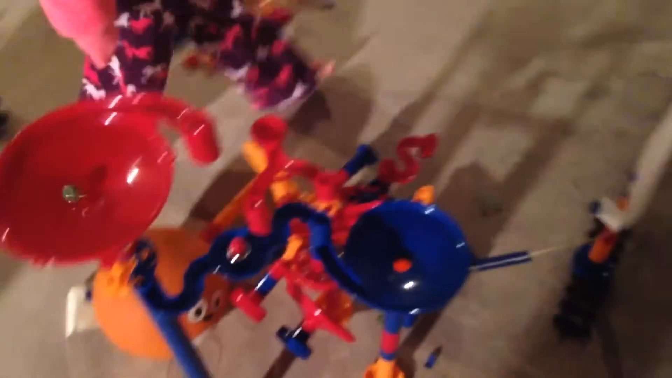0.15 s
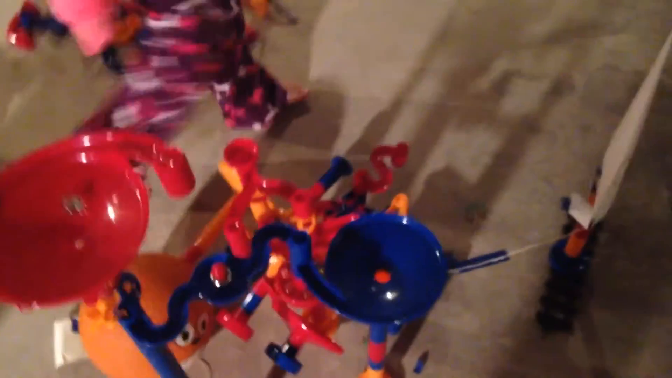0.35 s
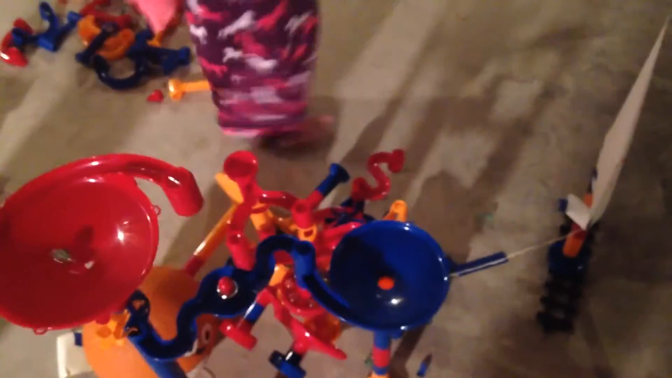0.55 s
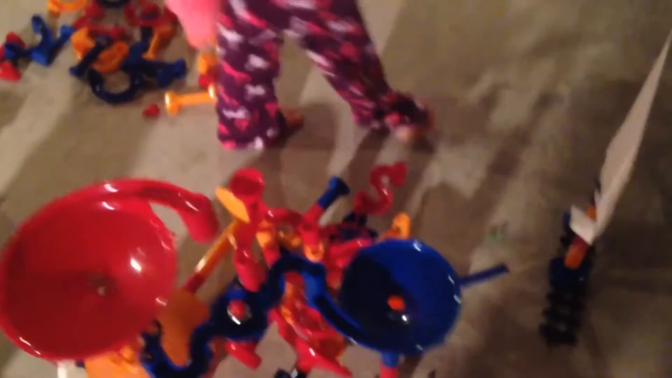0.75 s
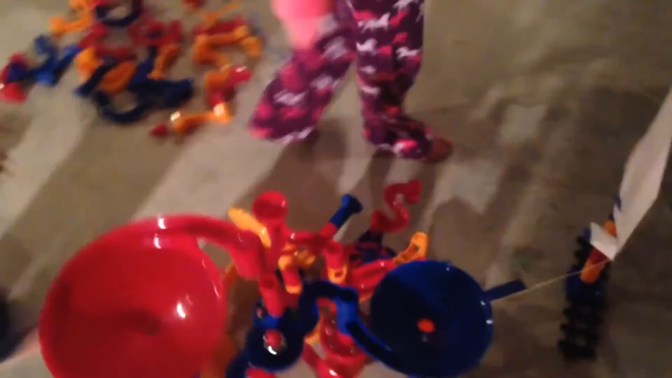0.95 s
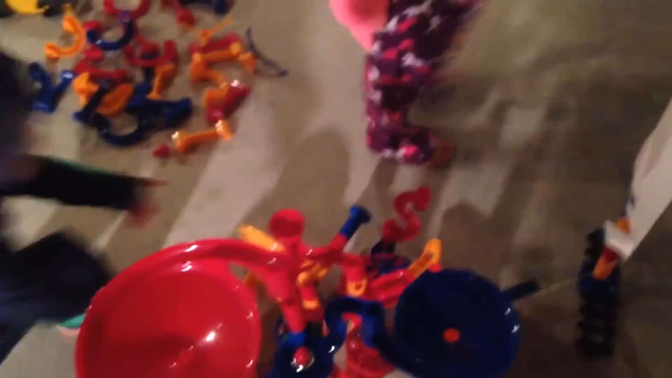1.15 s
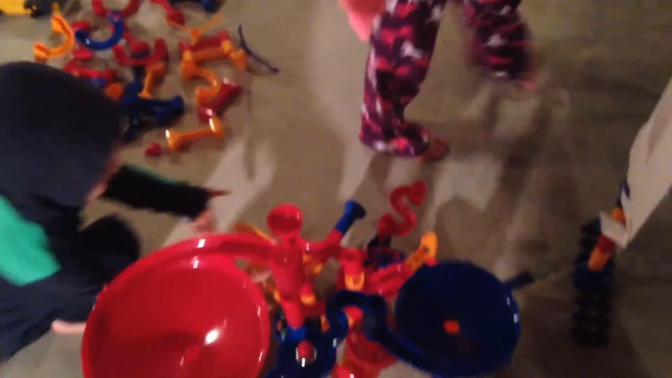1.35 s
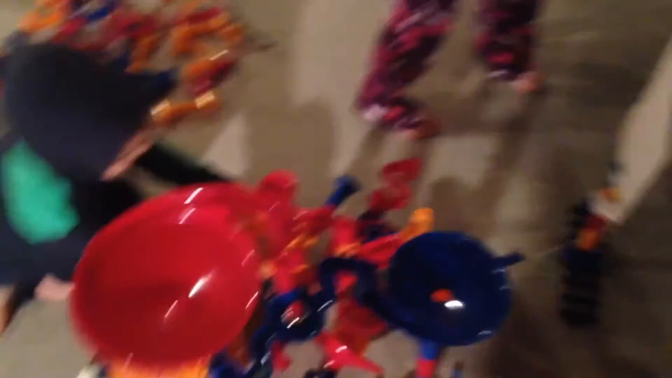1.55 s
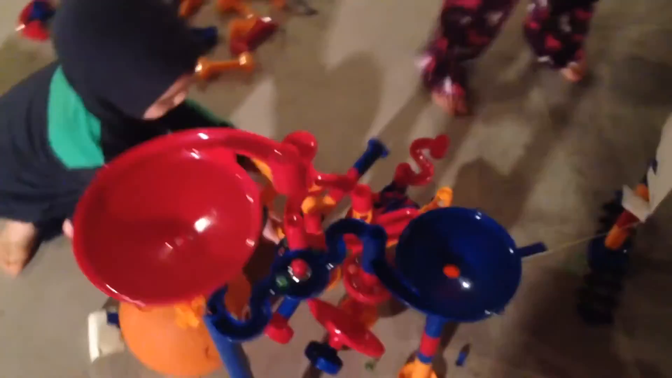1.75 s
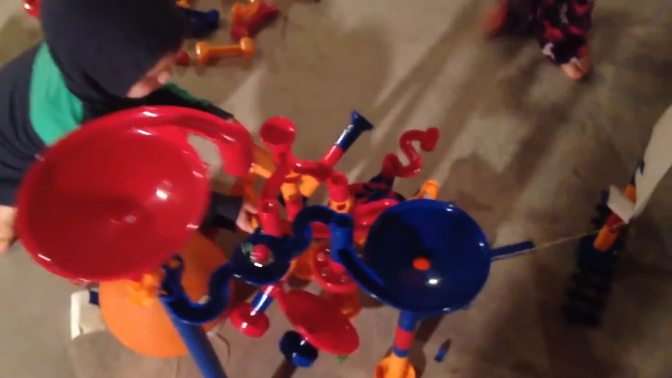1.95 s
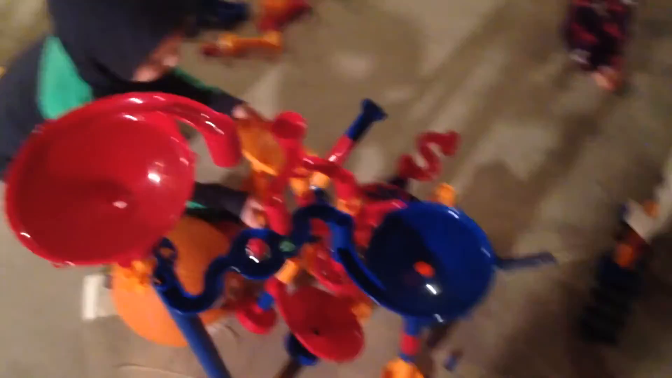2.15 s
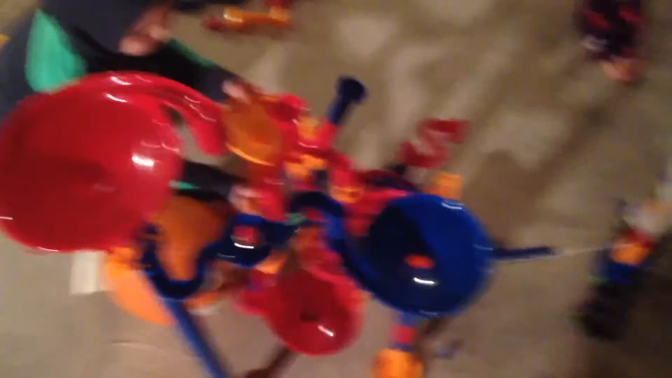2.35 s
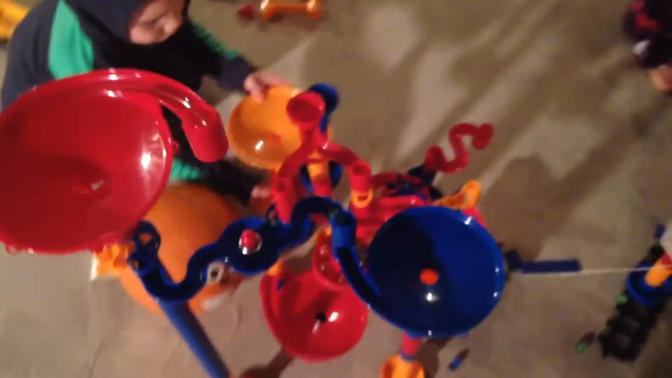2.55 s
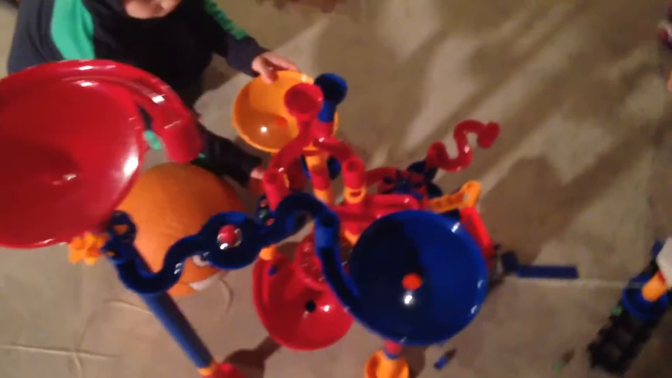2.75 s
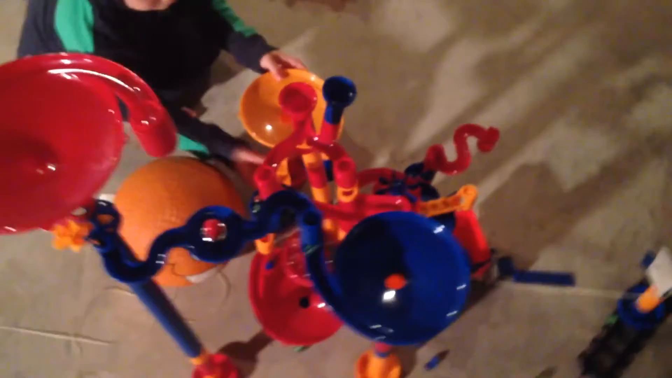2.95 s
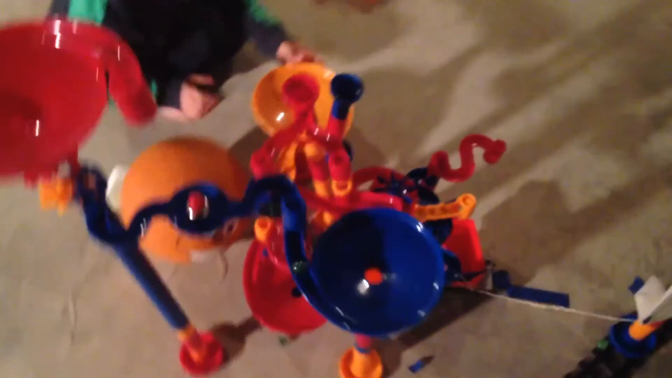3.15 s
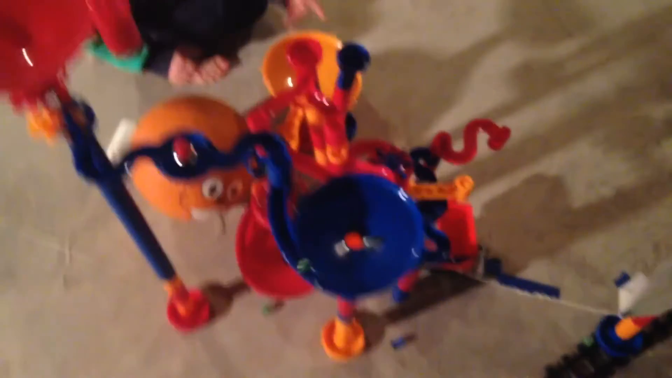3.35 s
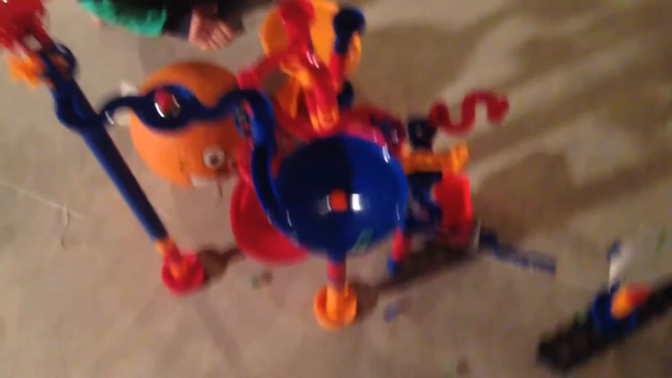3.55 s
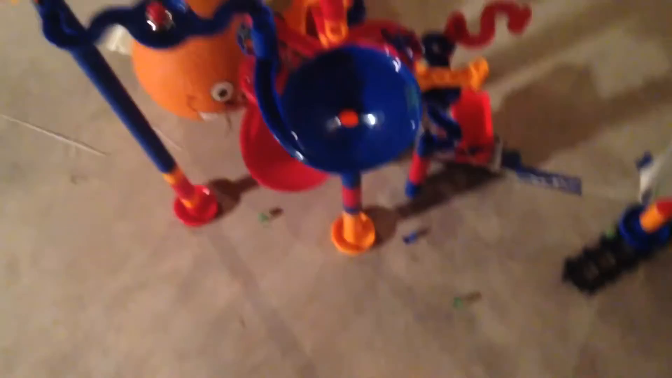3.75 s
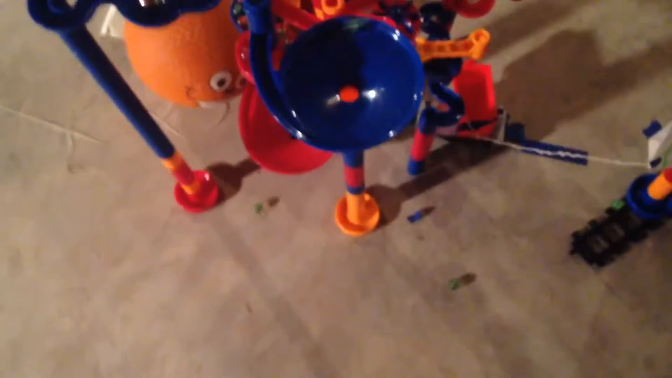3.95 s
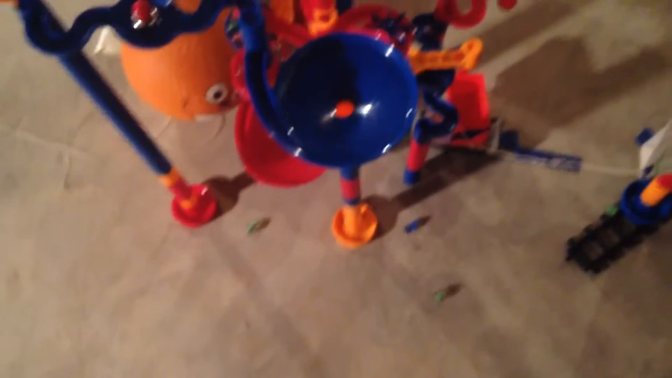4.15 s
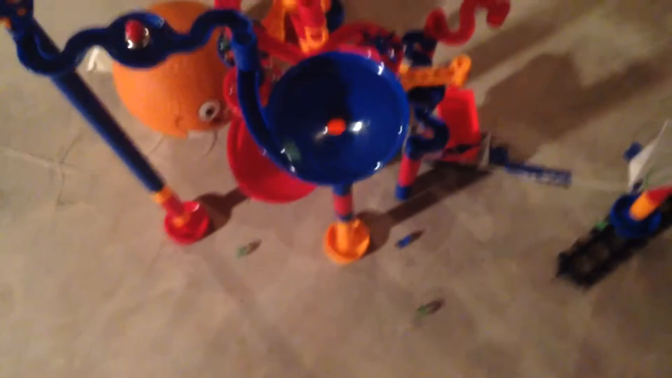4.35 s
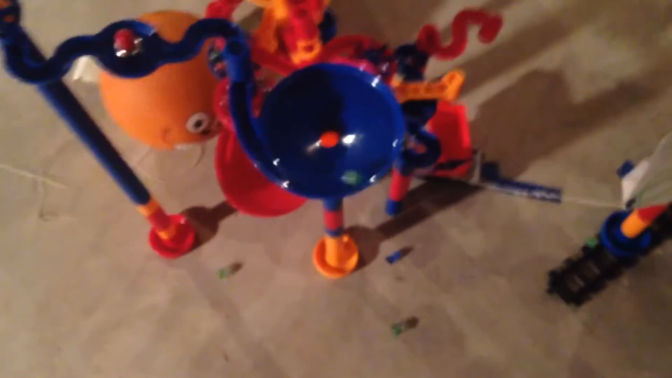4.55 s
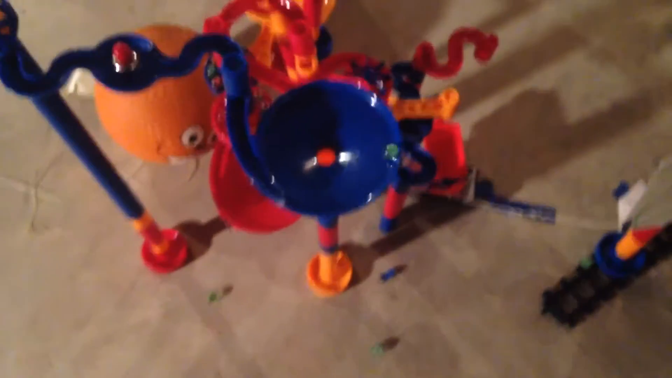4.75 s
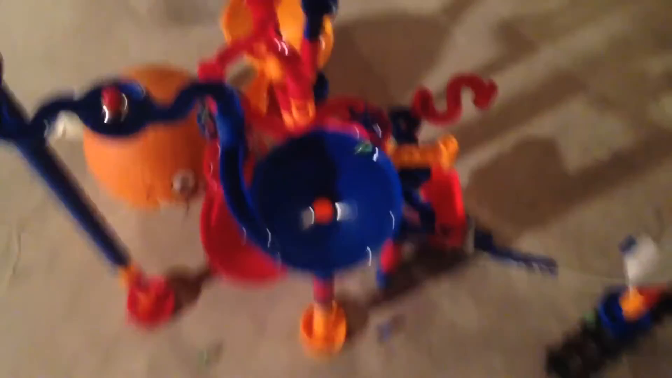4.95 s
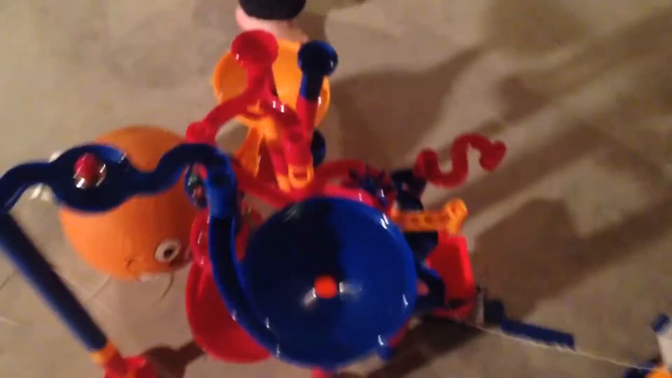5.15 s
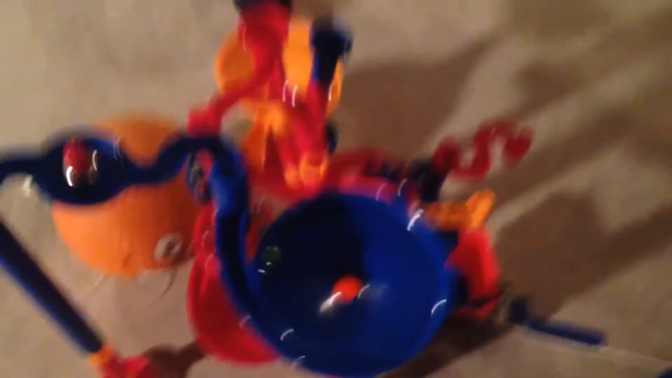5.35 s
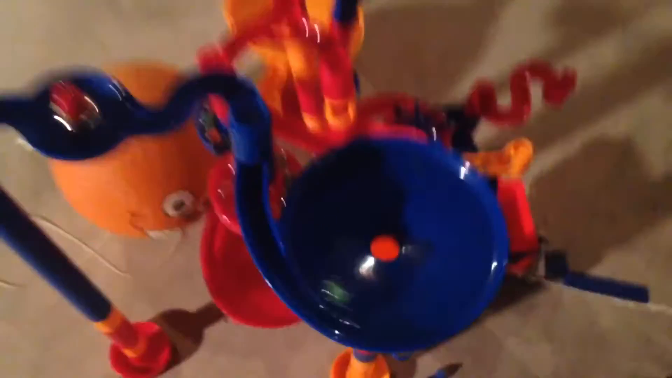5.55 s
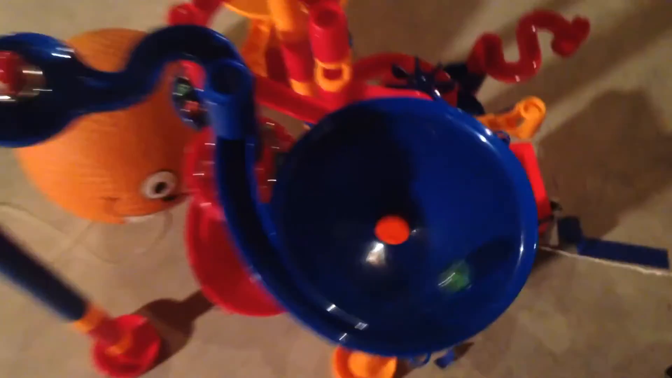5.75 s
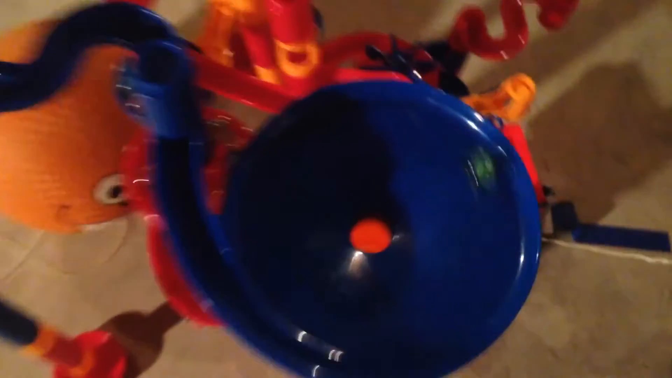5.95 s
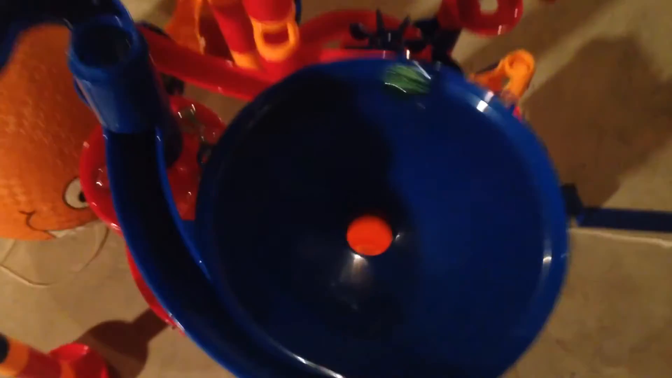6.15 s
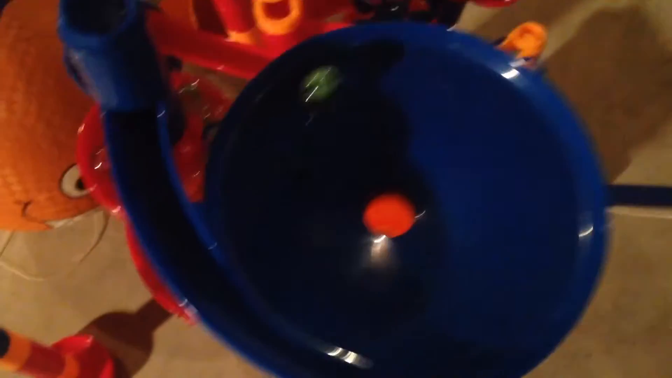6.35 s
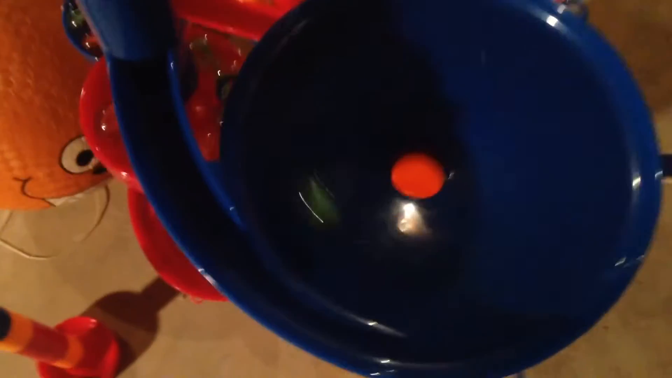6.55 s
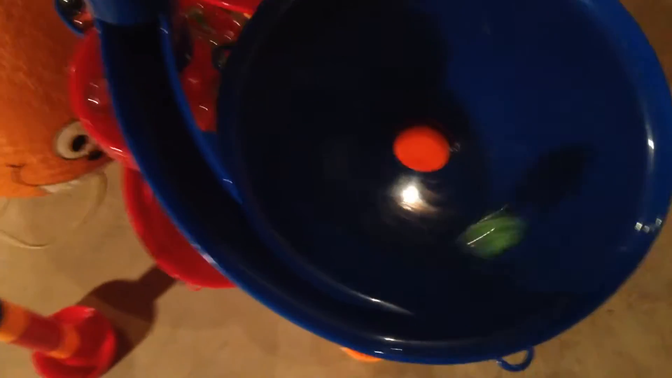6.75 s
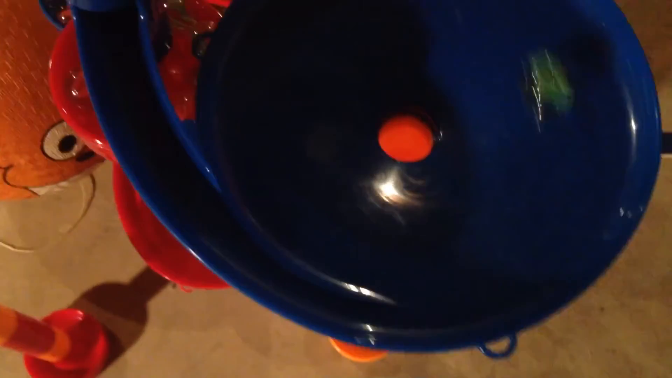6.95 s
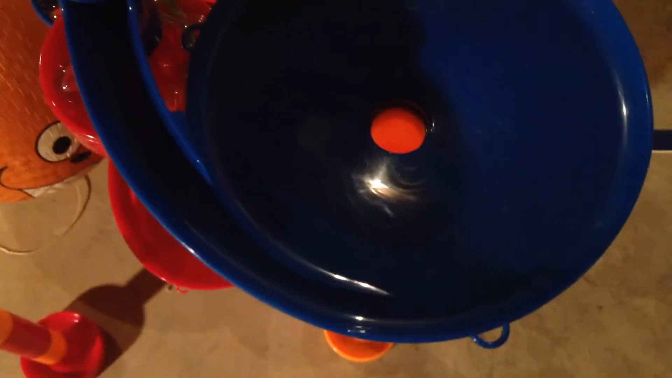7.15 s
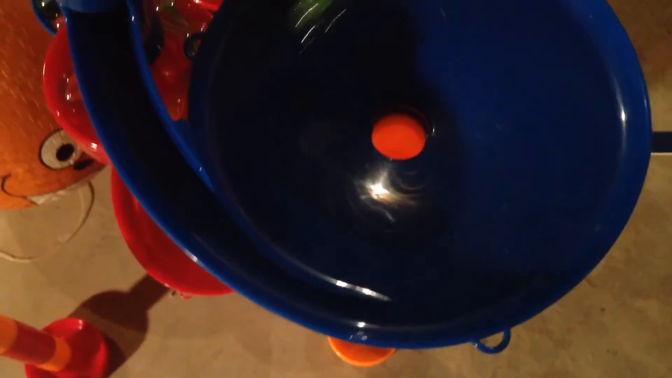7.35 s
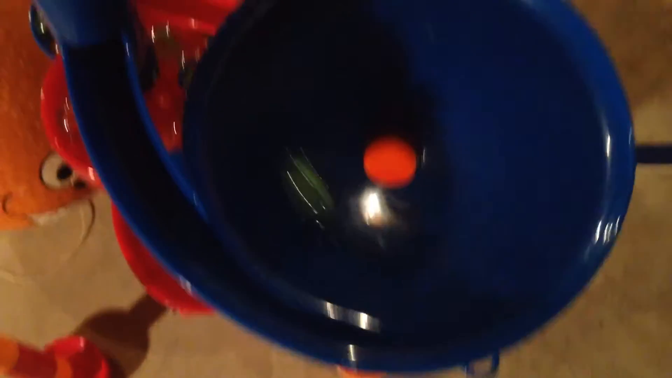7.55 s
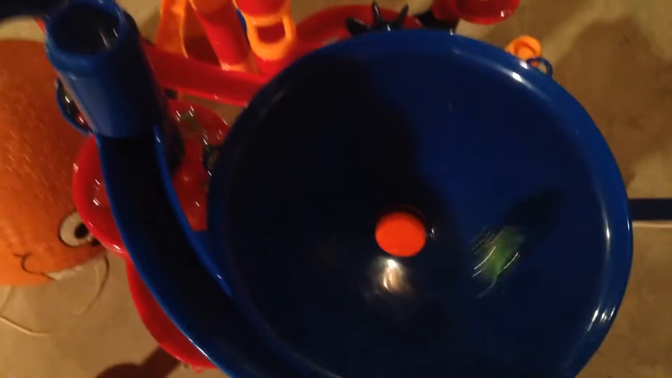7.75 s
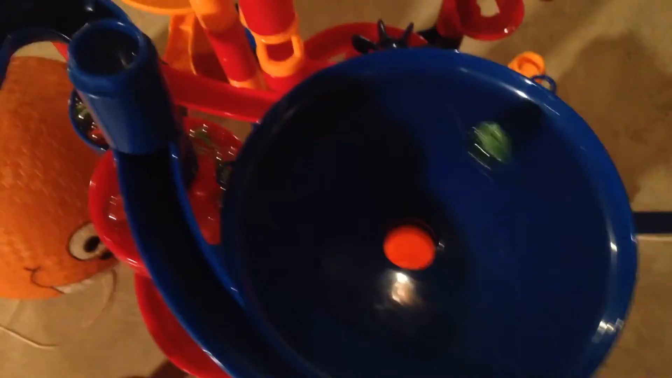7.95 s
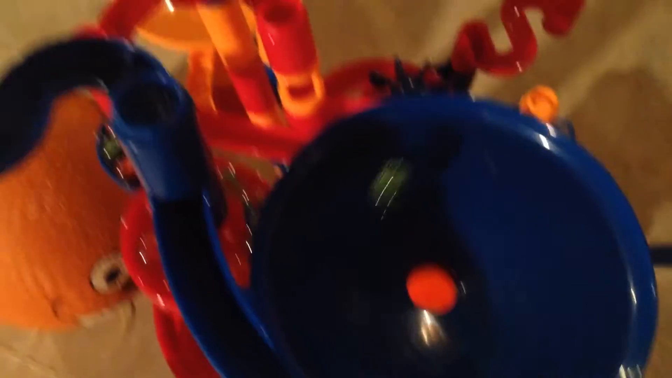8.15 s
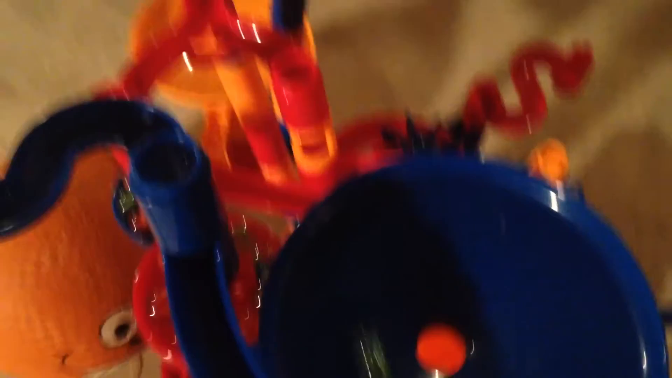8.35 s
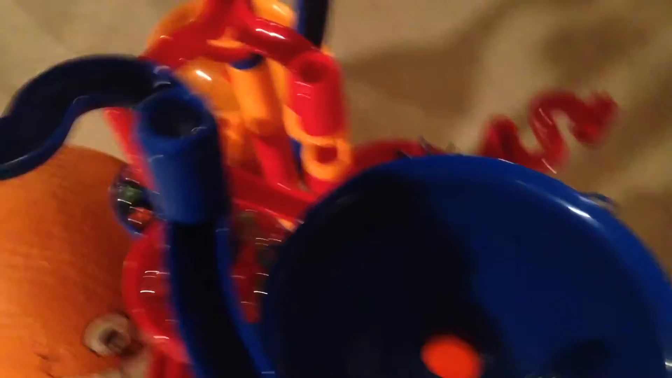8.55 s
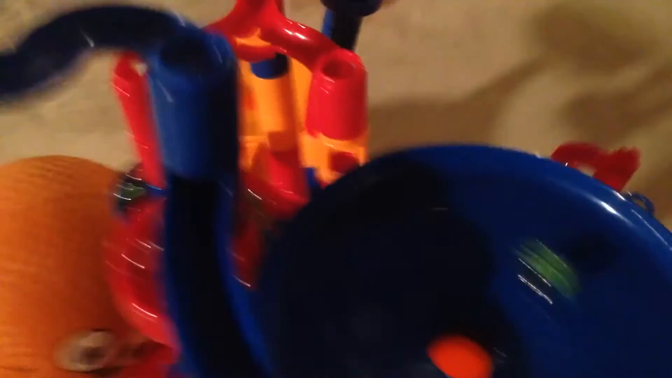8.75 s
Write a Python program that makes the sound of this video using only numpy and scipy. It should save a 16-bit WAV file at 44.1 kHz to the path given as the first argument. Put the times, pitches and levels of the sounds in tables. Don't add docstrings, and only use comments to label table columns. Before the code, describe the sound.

In a bare, hard-floored room, a few light marble taps lead to a sudden clatter of glass marbles down hollow plastic tubes. A lone marble drops, a plastic bowl bumps and rings, loose pieces rattle and a last marble lands hard. Then a single marble rolls around a thin funnel with a humming whirr, louder and closer once the handheld microphone leans in.

```python
import sys
import numpy as np
from scipy import signal
from scipy.fft import rfft, irfft
from scipy.io import wavfile
from scipy.ndimage import uniform_filter1d, map_coordinates

SR = 44100
rng = np.random.default_rng(int(sys.argv[2]) if len(sys.argv) > 2 else 0)


def to_wav(s):
    ch = np.atleast_2d(s).T
    pcm = np.round(np.clip(ch, -1, 1) * 32767)
    wavfile.write(sys.argv[1], SR, pcm.astype(np.int16))


def makeup_ratio(level_db):
    decades = np.asarray(level_db, float) / 20
    return 10 ** decades


N = 388962
SIZE = 8192


def unit(x):
    return x / np.sqrt(np.mean(x ** 2) + 1e-20)


def steady(x, span):
    return x / np.sqrt(np.abs(uniform_filter1d(x ** 2, int(span * SR))) + 1e-12)


def along(points, hz):
    f, v = np.transpose(points)
    return np.interp(np.log(hz + 1), np.log(f + 1), v)


def curves(rows):
    s, *columns = np.transpose(rows)
    t = np.arange(N) / SR
    return [np.interp(t, s, column, left=-120) for column in columns]


def wobble(rate):
    knots = rng.standard_normal(int(N * rate / SR) + 4)
    return map_coordinates(knots, [np.arange(N) * rate / SR])


def peak(f, centre, width):
    damping = (f * width) ** 2
    return damping / ((centre ** 2 - f * f) ** 2 + damping + 1e-9)


def body(modes, wall, wall_db, scatter_db=0, count=1, size=SIZE):
    f = np.fft.rfftfreq(size, 1 / SR)
    centre, width, db = np.transpose(modes)
    luck = rng.standard_normal((count, 2, len(centre)))
    centre = (centre * (1 + 0.0042 * scatter_db * luck[:, 0]))[..., None]
    strength = makeup_ratio(2 * (db + scatter_db * luck[:, 1]))[..., None]
    power = np.sum(strength * peak(f, centre, width[:, None]), axis=1)
    thin = along([(200, -30.0), (400, -11.0), (600, -0.5)], f)
    return f, np.sqrt(power * makeup_ratio(2 * thin) + makeup_ratio(2 * (along(wall, f) + wall_db)))


def causal(gain):
    cepstrum = irfft(np.log(gain + 1e-6))
    half = gain.shape[-1] - 1
    cepstrum[..., 1:half] *= 2
    cepstrum[..., half + 1:] = 0
    return np.exp(rfft(cepstrum))


def through(x, gain):
    response = irfft(causal(gain), SIZE)[:SIZE // 2]
    return unit(signal.oaconvolve(x, response)[:len(x)])


def roughness(rate, spread_db, smooth):
    bumps = rng.random(N) < rate / SR * makeup_ratio(4 * wobble(25))
    sizes = rng.standard_normal(N) * makeup_ratio(spread_db * rng.exponential(size=N).clip(0, 3))
    return unit(bumps * sizes) + smooth * rng.standard_normal(N)


def roaming(contact, gain, span, depth_db):
    z = signal.stft(through(contact, gain), nperseg=1024)[2]
    field = rng.standard_normal(z.shape)
    for axis, size in enumerate((3, span)):
        field = uniform_filter1d(field, size, axis=axis)
        field = uniform_filter1d(field, size, axis=axis)
    drifting = signal.istft(z * makeup_ratio(depth_db * unit(field)), nperseg=1024)[1]
    return steady(drifting[:len(contact)], span=0.17)


SKID, SKID_T60_S = .09, .02


def strikes(s, db, low_db, high_db, t60, f, gain, rattle):
    size = 2 * (len(f) - 1)
    t = np.arange(size // 2) / SR
    noise = rng.standard_normal((len(s), len(t)))
    chatter = rattle * makeup_ratio(-60 * t / np.clip(t60, .01, .4)[:, None])
    chatter = chatter + SKID * makeup_ratio(-60 * t / SKID_T60_S)
    push = noise * chatter * (1 - np.exp(-t / 0.00085))
    push[:, 0] += .8
    lows = np.interp(np.log(f + 1), np.log([700, 1200]), [1, 0])
    highs = np.interp(np.log(f + 1), np.log([3000, 8000]), [0, 1])
    tint = makeup_ratio(low_db[:, None] * lows + high_db[:, None] * highs)
    ringing = irfft(rfft(push, size) * causal(gain * tint))
    ringing *= (makeup_ratio(db) / np.abs(ringing).max(axis=1))[:, None]
    at = np.round(s * SR).astype(int)[:, None] + np.arange(size)
    return np.bincount(at.ravel(), ringing.ravel(), N + SIZE)[:N]


# (frequency [Hz], level [dB per Hz])
HISS = [(12, -52), (20, -18), (74, -4.5), (177, -3.5), (248, -6), (337, -7), (446, -8), (499, -7),
        (1030, -11), (14300, -16.5), (16000, -19)]


def hiss():
    f = np.fft.rfftfreq(SIZE, 1 / SR)
    return makeup_ratio(-66 + 0.22 * wobble(2.7)) * through(rng.standard_normal(N), makeup_ratio(along(HISS, f)))


# (time [s], nearness [0-1])
LEAN_IN = [
    (5.3, 0),
    (5.8, 1),
]


def nearness():
    return np.clip(curves([(0, 0)] + LEAN_IN)[0], 0, 1)


STAND_DB, NEAR_DB = -76.5, 7.5
BOWL_S, BOWL_DB, BOWL_SPAN_S = 2.14, 10.5, 0.37


def shudder():
    f = np.fft.rfftfreq(SIZE, 1 / SR)
    low = makeup_ratio(along([(20, -18.5), (75, -3.5), (200, 3.0), (330, -1.0), (450, -23.5), (900, -93.5)], f))
    bowl = np.exp(-((np.arange(N) / SR - BOWL_S) / BOWL_SPAN_S) ** 2)
    level_db = STAND_DB + NEAR_DB * nearness() + BOWL_DB * bowl + .8 * wobble(1.1)
    return makeup_ratio(level_db + 2.2 * wobble(11.0)) * through(rng.standard_normal(N), low)


# (time [s], frequency [Hz], level [dB], T60 [s], rise [s])
RINGS = [(0, 1390, -42, .15, .002), (0.056, 1400, -36, .12, .003), (.33, 445, -47, .3, .02),
         (0.3, 1450, -33, 0.45, 0.031), (.325, 2380, -36, .15, 0.033), (1.205, 70.6, -53, .1, .004),
         (1.622, 12380, -35, 0.18, 0.0018), (1.622, 3900, -20.5, 0.032, 0.00074),
         (1.622, 3245, -21, 0.04, 0.00037), (1.626, 1393, -23.5, 0.1, 0.004), (1.63, 1970, -33, 0.17, .004),
         (1.64, 663, -44, 0.19, 0.0056), (1.98, 953, -44, 0.3, 0.0098), (2.03, 1050, -35, 0.41, .02),
         (2.072, 70.4, -51, 0.065, .004), (2.1, 1245, -27, 0.2, 0.015), (2.14, 903, -21, 0.38, 0.031),
         (2.15, 985, -24, 0.35, 0.033), (2.17, 914, -27.5, 0.27, 0.023), (2.27, 250, -46, 0.1, 0.0044),
         (2.522, 163, -47, 0.14, .004), (2.526, 1367, -20.5, 0.17, 0.005),
         (5.937, 1073, -29.5, 0.088, 0.002), (5.939, 1408, -26, 0.1, 0.002), (2.16, 1040, -34, .3, .015),
         (2.19, 1290, -38, .25, .02), (2.225, 1450, -38, .15, .01), (2.115, 1120, -33, .2, .012),
         (2.11, 798, -35, .2, 0.0088)]


def rings():
    out, t = np.zeros(N + SR), np.arange(SR // 2) / SR
    damped = 1 / (1 + (t / 0.11) ** 8)
    for s, hz, db, t60, rise in RINGS:
        sway = map_coordinates(rng.standard_normal(SR // 1000), [t * 60])
        swell = makeup_ratio(db - 60 * t / t60) * (1 - np.exp(-t / rise)) ** 2
        out[round(s * SR):][:len(t)] += damped * swell * np.sin(2 * np.pi * hz * t + 1.18 * sway)
    return out[:N]


# (time [s], level [dB])
JOSTLE = [(0.0, -49.5), (0.12, -59.5), (0.42, -84), (0.66, -68), (0.79, -47), (0.84, -80), (0.99, -34),
          (1.16, -40), (1.3, -57.5), (1.55, -55), (1.78, -68), (1.99, -61.5), (2.06, -45), (2.17, -45),
          (2.24, -49), (2.46, -56.5), (2.53, -39), (2.7, -79)]
# (frequency [Hz], width [Hz], level [dB])
TUBES = [(444, 41, -9.5), (550, 14, -26), (896, 32, -8.5), (1390, 26.9, 0.5), (1810, 53, -2.5),
         (2140, 400, -9), (3290, 130, -15.5), (3523, 50, -9.5), (4290, 330, -9), (4850, 190, -18.5),
         (5510, 190, -12), (6010, 250, -19), (6680, 170, -14.5), (7950, 73, -38)]
# (frequency [Hz], level [dB per Hz])
TUBE_WALL = [(59, -66.5), (100, -30), (302, -23), (415, -5), (502, -17.5), (558, -4), (1060, -18),
             (1360, -4.5), (10500, -23), (14700, -38.5), (16000, -51)]
SCRAPE_DB, SCRAPE_GROWS = -62.5, 0.34


def jostle():
    busy = 3 * SR
    dull_db = curves(JOSTLE)[0][:busy]
    bright_db = SCRAPE_DB + SCRAPE_GROWS * (dull_db + 48.5)
    f, (gain,) = body(TUBES, TUBE_WALL, wall_db=0.0)
    contact = roughness(rate=1200, spread_db=2.5, smooth=0.94) * makeup_ratio(1.4 * wobble(30.1))
    contact = contact[:busy]
    dull = roaming(contact, gain / (1 + (f / 2800) ** 6), 4, depth_db=4.5)
    bright_gain = makeup_ratio(along(TUBE_WALL, f)) / (1 + (2800 / (f + 1)) ** 6)
    bright = roaming(contact, bright_gain, 4, depth_db=4.5)
    return np.pad(makeup_ratio(dull_db) * dull + makeup_ratio(bright_db) * bright, (0, N - busy))


# (time [s], level [dB], sharp highs [dB], note [Hz])
TAPS = [(0.0044, -49, -54, 1390), (0.0538, -29.5, -38, 1407), (0.2862, -45.5, -50, 1600),
        (0.3105, -44, -55, 1460), (0.335, -37, -50, 2370), (0.356, -32.5, -43, 2370),
        (0.3278, -38, -51, 2360), (0.3457, -30.5, -52, 1480), (0.378, -41, -60, 1420),
        (0.558, -50, -50, 1390)]
# (time [s], level [dB], sharp highs [dB], note [Hz])
CASCADE = [(0.5903, -26, -31, 1950), (0.6275, -31, -27, 1810), (0.6366, -21, -21, 1430),
           (0.6448, -19.5, -15, 1595), (0.6629, -16.5, -29.5, 1904), (0.6675, -21, -29.5, 1900),
           (0.678, -26.5, -24.5, 1500), (0.6915, -28, -25, 2000), (0.7005, -27.5, -22, 1450),
           (0.7115, -28, -24.5, 1450), (0.7222, -20.5, -21, 1560), (0.7378, -23, -31, 1470),
           (0.7484, -25, -5, 1870), (0.7565, -19, -14, 1390), (0.762, -24, -12, 5600),
           (0.7675, -22.5, -25, 1450), (0.778, -29, -22, 1500), (0.9005, -29, -11, 2300),
           (0.8904, -33.5, -16.5, 1810), (0.8957, -26, -23.5, 1400), (0.9086, -21, -48, 1810),
           (0.9419, -19.5, -25.5, 1750), (0.9738, -8, -21.5, 1650), (0.977, -12.5, -28, 1420),
           (0.981, -16, -28, 2100), (1.0066, -16.5, -19, 1390), (1.0404, -28.5, -1, 1590),
           (1.0523, -26.5, 7, 1380), (1.0654, -24.5, -23, 1390), (1.0754, -28, 0, 1390),
           (1.1274, -37, -6, 1850), (1.1395, -21, -27.5, 1840), (1.151, -24.5, -28, 1950),
           (1.165, -26, -28, 1600), (1.18, -25.5, -25, 1950), (1.1752, -26.5, -27, 1330), ]
# (time [s], level [dB], sharp highs [dB], note [Hz])
DROPS = [(1.2032, -10.5, -18, 1390), (1.2065, -14, -20, 1390), (1.2125, -17, -22, 1390),
         (1.2365, -22, -24, 1390), (1.2244, -23, -30.5, 1330), (1.2585, -13, -19, 1390),
         (1.2562, -10.5, -19, 1390), (1.284, -24, -23, 1326), (1.3094, -27.5, -24, 2080)]
# (time [s], level [dB], sharp highs [dB], note [Hz])
LONE = [
    (1.4391, -45, -32, 1390),
    (1.513, -39, -15, 1390),
    (1.6209, -14.5, -9.5, 1940),
    (1.808, -40, -9, 1610),
]
# (time [s], level [dB], sharp highs [dB], note [Hz])
BUMPS = [(1.939, -36.5, -62, 2180), (1.985, -47, -37, 940), (2.0239, -23, -24, 1010),
         (2.034, -26.5, -30, 1880), (2.073, -17.5, -10.5, 3420), (2.088, -26, -30, 1910),
         (2.1212, -19.5, -15, 1145), (2.045, -28, -30, 1420), (2.095, -24.5, -27, 1930)]
# (time [s], level [dB], sharp highs [dB], note [Hz])
RATTLE = [(2.2251, -46, -40, 1420), (2.245, -39.5, -42, 1700), (2.2694, -35, -32, 1700),
          (2.2951, -29, -31, 1870), (2.3155, -26.5, -26, 1970), (2.3484, -35, -30, 2040),
          (2.439, -35, -30, 2500), (2.36, -30.5, -22, 1250), (2.389, -30.5, -30, 1670),
          (2.4264, -33, -32, 1900)]
# (time [s], level [dB], sharp highs [dB], note [Hz])
LANDING = [(2.4776, -15, -14.5, 2490), (2.5195, -14, -7, 3470), (2.5225, -11.5, -11.5, 1420),
           (2.529, -13, -21, 1390), (2.547, -21, -19, 1390), (2.503, -27.5, -20, 1400),
           (2.62, -32, -19, 1510), (2.5614, -23.5, -14, 2470), (2.5746, -21, -15, 1390),
           (2.7485, -47, -21, 1560)]
# (time [s], level [dB], sharp highs [dB], note [Hz])
SHELL = [
    (2.9936, -42.5, -6, 1430),
    (8.021, -46, -2, 2070),
]
HOLLOW_SCATTER_DB, RATTLE_SCATTER = 1.5, 0.063


def run_blows():
    # (blows, hollow lows [dB], rattle T60 [s])
    kinds = [(TAPS, -15, 0.11), (CASCADE, -15.5, 0.075), (DROPS, -23, .09), (SHELL, -20, .06),
             (LONE, -25, 0.11), (BUMPS, -13.5, 0.095), (RATTLE, -17, 0.048), (LANDING, -17, .1)]
    blows = [row + (low, t60) for rows, low, t60 in kinds for row in rows]
    s, db, high_db, note_hz, low_db, t60 = np.transpose(blows)
    luck = rng.standard_normal((len(s), 2))
    low_db = low_db + HOLLOW_SCATTER_DB * luck[:, 0]
    t60 = t60 * np.exp(RATTLE_SCATTER * luck[:, 1])
    f, gain = body(TUBES, TUBE_WALL, wall_db=-5.5, scatter_db=3, count=len(s))
    gain = np.sqrt(gain ** 2 + makeup_ratio(7.5) * peak(f, note_hz[:, None], 59))
    return strikes(s, db + 0.6, low_db + 13.5, high_db + 12.0, t60, f, gain, rattle=0.11)


# (frequency [Hz], T60 [s])
ROOM = [(200, 0.46), (1500, 0.29), (10000, 0.18)]


def room(x):
    hz, t, z = signal.stft(rng.standard_normal(SR // 2), SR, nperseg=256)
    decay = makeup_ratio(-60 * t / along(ROOM, hz)[:, None])
    tail = signal.istft(z * decay, SR, nperseg=256)[1]
    delayed = np.pad(x, (250, 0))
    return signal.fftconvolve(delayed, tail / np.linalg.norm(tail))[:N]


# (time [s], level [dB])
THUDS = [
    (1.939, -56),
    (2.072, -43),
    (2.993, -58),
]
THUD_S = 0.002


def thuds():
    out = np.zeros(N)
    for s, db in THUDS:
        u = np.clip(np.arange(N) / SR - s, 0, 1) / THUD_S
        out += makeup_ratio(db) * u * (2 - u) * np.exp(-u)
    return out


# (time [s], whirr level [dB])
CIRCLING = [(2.85, -83.5), (3.0, -60.5), (3.18, -54), (3.41, -47), (3.9, -50), (4.25, -54.5), (4.76, -51),
            (5.35, -51), (5.48, -55), (5.78, -47.5), (6.3, -46), (6.64, -48), (7.2, -46), (7.9, -47.5),
            (8.5, -46), (8.82, -46)]
LAPS = [2.43, 3.4, 4.4, 5.4, 6.33, 7.28, 8.29, 9.2]
# (part of the lap [0-1], hum [dB], whirr [dB], grit [dB])
LAP = [(0, 3.5, 1, 1.5), (.07, -4, -2.5, 1.5), (.2, -0.5, 0, 1.5), (.45, 0.5, 0, 2.5), (.6, -0.5, 0, -3),
       (.9, 1.5, 0, -3)]
HUM_DB, GRIT_DB = (-4.5, -1), (-20, -15.5)
SINK_S, SINK_HUM_DB, SINK_GRIT_DB = (7.5, 7.8), -3, 3.5
HUM_LAG_S, HUM_LAG_DB = (2.9, 3.3), -9.5


def pressing():
    t = np.arange(N) / SR
    lap = np.interp(t, LAPS, np.arange(len(LAPS))) % 1
    part, *swings = np.transpose(LAP)
    pressure_db = curves(CIRCLING)[0]
    hum, whirr, grit = [pressure_db + np.interp(lap, part, db, period=1) for db in swings]
    near, sunk = nearness(), np.interp(t, SINK_S, (0, 1))
    hum_db = np.interp(near, (0, 1), HUM_DB) + SINK_HUM_DB * sunk
    hum_db = hum_db + np.interp(t, HUM_LAG_S, (HUM_LAG_DB, 0))
    grit_db = np.interp(near, (0, 1), GRIT_DB) + SINK_GRIT_DB * sunk
    return hum + hum_db, whirr, grit + grit_db


# (frequency [Hz], level [dB per Hz])
FUNNEL_WALL = [(240, -34.5), (400, -82), (665, -14), (874, -22), (1430, -28), (2040, -38), (2940, -15.5),
               (3810, -12.5), (9000, -23.5), (11700, -85), (19800, -120)]
SINK_WHIRR_DB = -2.5
CONE_HZ, CONE_WIDTH_HZ, CONE_DB = 2160, 970, (-18.5, -5)


def rolling(modes, wall_db, contact, wander_db, heard):
    hum_db, whirr_db, grit_db = [db[heard] for db in pressing()]
    t, contact = np.arange(N)[heard] / SR, contact[heard]
    f, (gain,) = body(modes, FUNNEL_WALL, wall_db)
    low, high = 1 / (1 + (f / 820) ** 12), 1 / (1 + (2800 / (f + 1)) ** 6)
    hum = roaming(contact, gain * low, 3, depth_db=wander_db)
    hum = makeup_ratio(hum_db - 1.0 + 1.34 * wobble(14)[heard]) * hum
    specks = contact * np.abs(contact) ** 0.15 * makeup_ratio(3.0 * wobble(45)[heard])
    specks = steady(specks, span=0.12)
    wall = roaming(contact + .3 * specks, gain * (1 - low) * (1 - high), 8, depth_db=3.5)
    whirr = makeup_ratio(whirr_db - 1.5 + np.interp(t, SINK_S, (0, SINK_WHIRR_DB))) * wall
    cone = roaming(specks, gain * peak(f, CONE_HZ, CONE_WIDTH_HZ), 5, depth_db=4.5)
    cone = makeup_ratio(whirr_db + np.interp(t, SINK_S, CONE_DB)) * cone
    grit = makeup_ratio(grit_db) * roaming(specks, gain * high / (1 + (f / 6500) ** 2), 4, depth_db=5.0)
    out = np.zeros(N)
    out[heard] = hum + whirr + cone + grit
    return out


# (frequency [Hz], width [Hz], level [dB])
FUNNEL = [(667.4, 23.8, 7.5), (934, 36, -8), (1173, 29, -10.5), (1430, 55, -3), (1970, 170, -7.5),
          (2496, 83, -10.5), (3162, 53, -10), (3500, 46, -19.5), (4040, 26, -20.5), (4370, 46, -19.5),
          (4990, 49, -20.5)]
# (frequency [Hz], width [Hz], level [dB])
FUNNEL_FAR = [(655, 25, 2.5), (940, 30, -4.5), (1106, 60, -6), (1430, 65, -5), (1950, 19, -4.5),
              (2470, 30, -22), (3226, 35, -14), (4130, 120, -16),
              (589, 22, -5), (692, 30, -3.5)]


def funnel():
    contact = roughness(rate=600, spread_db=3.0, smooth=0.78) * makeup_ratio(2.2 * wobble(35))
    contact = steady(contact, span=0.088)
    near = nearness()
    aside, above = slice(int(2.7 * SR), 6 * SR), slice(5 * SR, N)
    side = rolling(FUNNEL_FAR, -14.0, contact, wander_db=3.0, heard=aside)
    top = rolling(FUNNEL, -11.5, contact, wander_db=0.8, heard=above)
    return np.sqrt(1 - near) * side + np.sqrt(near) * top + hops()


# (time [s], level [dB], note [Hz])
CLACK = [
    (7.6173, -17, 3890),
    (7.6577, -28, 2900),
    (5.9351, -30.5, 1060),
    (5.9445, -26, 1410),
    (3.078, -38, 1950),
    (6.421, -31, 2100),
    (6.762, -34, 1860),
]
# (time [s], level [dB], note [Hz])
SEAM_HOPS = [(3.0633, -37, 1900), (3.2034, -49, 1480), (3.2239, -41, 1410), (3.3232, -34.5, 1430),
             (3.39, -41, 1400), (3.4434, -43.5, 1920), (3.5132, -43, 1480), (3.5661, -41, 1440),
             (3.6474, -43, 1990), (3.678, -36, 1170), (3.7574, -40, 1430), (3.836, -44, 1950),
             (3.8694, -40, 1420), (3.9293, -45, 1450), (3.9896, -32, 1430), (4.0819, -39, 1890),
             (4.1283, -43, 1950), (4.224, -47, 1210), (4.281, -47, 1480), (4.3374, -46, 1480),
             (4.4262, -48, 1420), (4.4601, -43, 1950), (4.5249, -53, 1200), (4.5594, -36.5, 1450),
             (4.6621, -47, 1450), (4.7387, -42, 1410), (4.8292, -41, 1110), (4.8786, -43, 1440),
             (4.966, -46, 1410), (4.9839, -40, 1400), (5.0368, -45, 1150), (5.1525, -46, 1460),
             (5.1814, -45, 1470), (5.2253, -43, 1360), (5.3311, -48, 1390), (5.3755, -44, 1400),
             (5.5655, -40, 1290), (5.5934, -40, 1520), (5.6488, -35.5, 1520), (5.9401, -30, 1420),
        (6.0264, -35, 1410), (6.0788, -42, 1390), (6.1352, -35, 1310), (6.1531, -37, 1390),
        (6.213, -40, 1470), (6.2309, -38, 1470), (6.2808, -33, 1410), (6.3113, -37, 1910),
        (6.3352, -31.5, 2000), (6.3706, -39, 1880), (6.4035, -31.5, 2090), (6.4784, -40, 1510),
        (6.5143, -37, 1900), (6.5338, -28.5, 1920), (6.5627, -27, 1450), (6.6016, -39, 1410),
        (6.6355, -35.5, 1500), (6.6944, -34.5, 1500), (6.7153, -31.5, 1510), (6.7972, -30, 2060),
        (6.868, -31.5, 1400), (6.9753, -41, 2190), (6.9907, -37, 2100), (7.0291, -31.5, 1410),
        (7.0995, -41, 2060), (7.1329, -41, 2090), (7.2446, -38, 1430), (7.324, -36, 1900),
        (7.3409, -31.5, 1390), (7.4362, -35, 1490), (7.5519, -38, 1640), (7.5704, -33, 1490),
             (7.7143, -30.5, 2060), (7.7512, -37, 2090), (7.8599, -38, 2120), (7.8849, -35, 2030),
            (7.9293, -35.5, 2050), (7.9542, -37, 2020), (7.9677, -31, 1410), (8.0271, -33, 2070),
            (8.068, -33.5, 2070), (8.1049, -40, 1890), (8.1228, -39, 1420), (8.1538, -33, 2100),
            (8.2047, -39, 1540), (8.2361, -31, 1430), (8.266, -28.5, 1470), (8.3523, -31.5, 1440),
            (8.4242, -34.5, 1450), (8.4496, -32, 1520), (8.5075, -40, 1980), (8.5459, -36, 1450),
            (8.5858, -34, 1900), (8.6147, -30, 1900), (8.6581, -34.5, 2060), (8.6751, -31, 1970),
            (8.7015, -28.5, 2110), (8.716, -25, 2040), (8.7469, -29, 2150)]
SHARP_DB = (-14.5, -12)
CLACK_HIGH_DB, CLACK_LOW_DB, CLACK_HZ, CLACK_NOTE_DB = -9.5, -14, (2430, 3900), -8
HOP_DB, HOP_NOTE_DB, HOP_NOTE_WIDTH_HZ = -1.5, 2.5, 87


def hops():
    s, db, note_hz = np.transpose(CLACK + SEAM_HOPS)
    hard = np.arange(len(s)) < 2
    high_db = np.where(hard, CLACK_HIGH_DB, np.interp(s, np.transpose(LEAN_IN)[0], SHARP_DB))
    low_db, t60 = np.where(hard, CLACK_LOW_DB, -7), np.where(hard, .1, 0.04)
    f, gain = body(FUNNEL, FUNNEL_WALL, wall_db=-4.5, scatter_db=4, count=len(s), size=SIZE // 2)
    clack = hard[:, None] * makeup_ratio(CLACK_NOTE_DB) * sum(peak(f, hz, 640) for hz in CLACK_HZ)
    note = makeup_ratio(HOP_NOTE_DB) * peak(f, note_hz[:, None], HOP_NOTE_WIDTH_HZ)
    gain = np.sqrt(gain ** 2 + clack + note)
    return strikes(s, db + HOP_DB, low_db, high_db, t60, f, gain, rattle=0.27)


def scene():
    far = run_blows() + jostle() + rings()
    near = funnel()
    reverberation = room(makeup_ratio(-11) * far + makeup_ratio(-10.0) * near)
    return (far + near + reverberation + shudder() + thuds() + hiss())[None]


def low_pass(x):
    return signal.sosfilt(signal.butter(12, 16450, fs=SR, output="sos"), x)


def record(dry):
    edge = signal.firwin(255, 15450, fs=SR)
    mix = signal.fftconvolve(dry, edge[None], "same", axes=1)
    return low_pass(mix)


dry = scene()
out = record(dry)
to_wav(out)
```